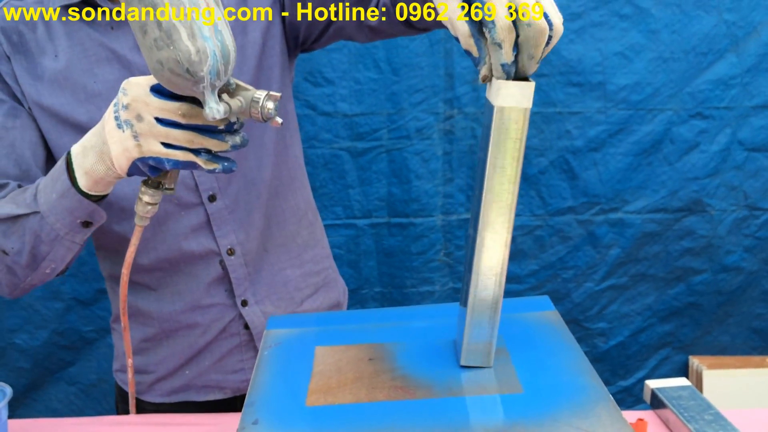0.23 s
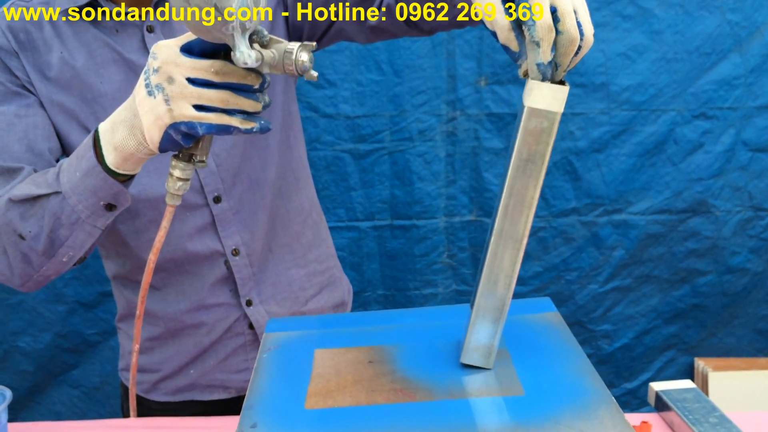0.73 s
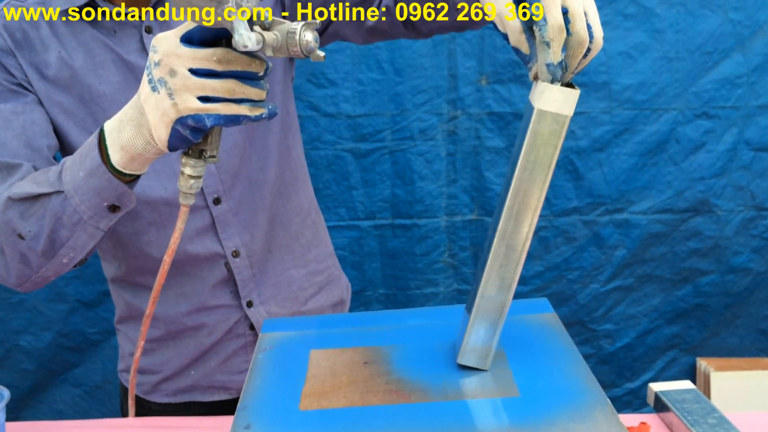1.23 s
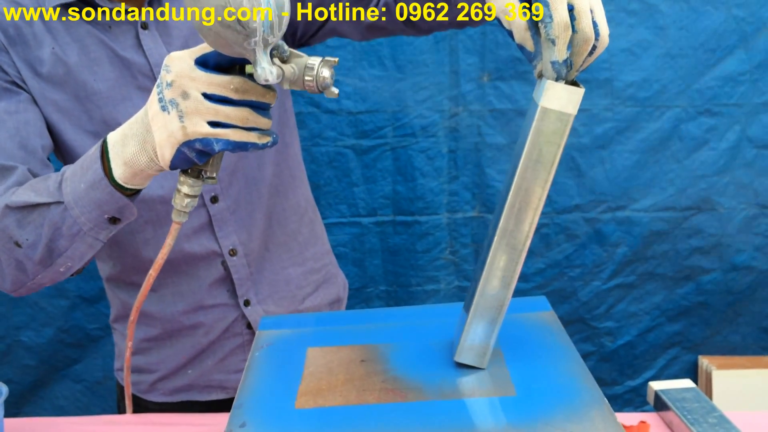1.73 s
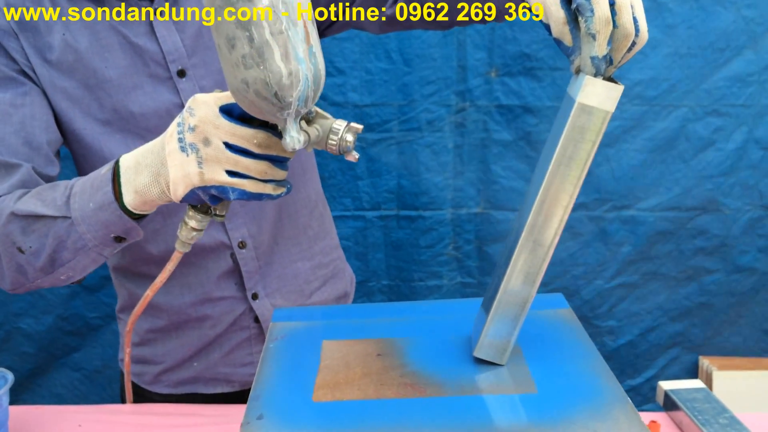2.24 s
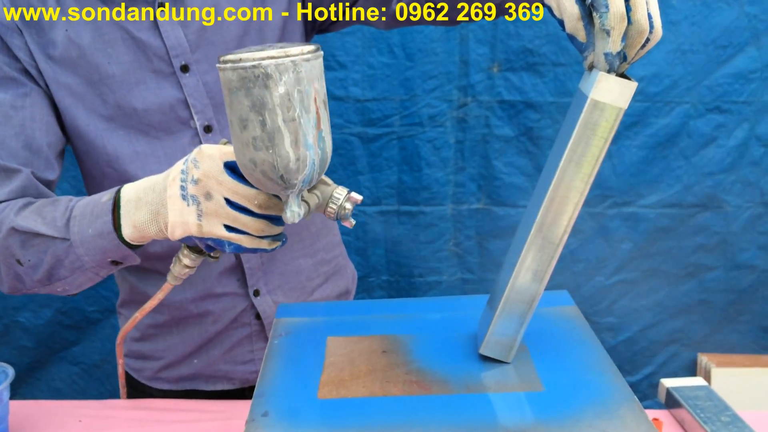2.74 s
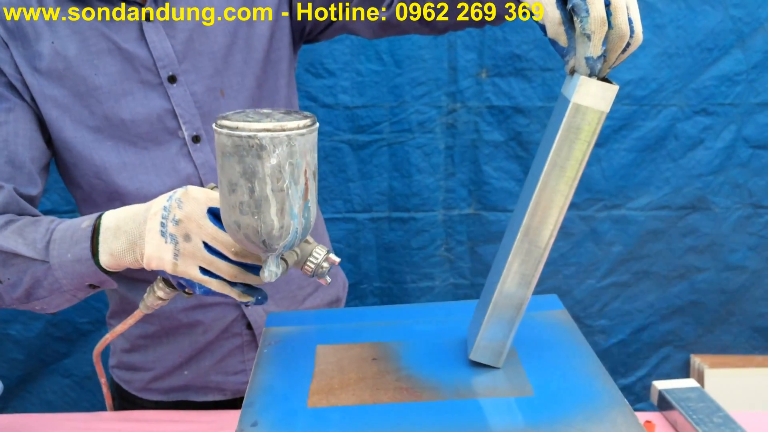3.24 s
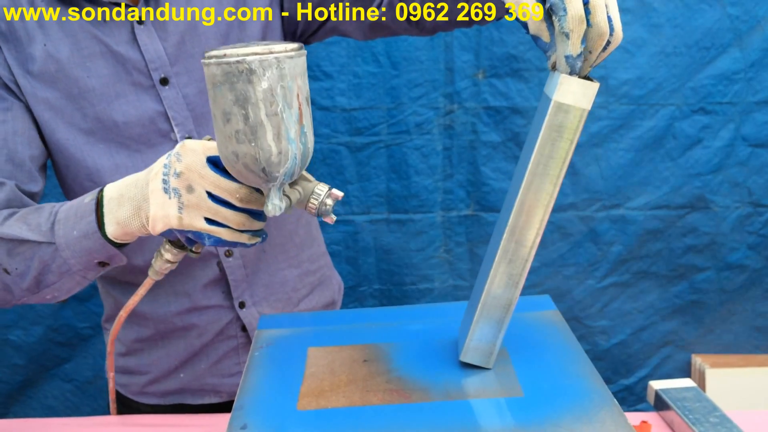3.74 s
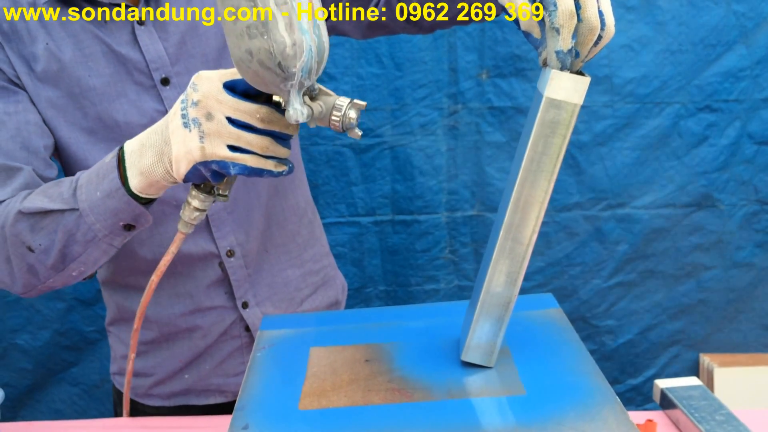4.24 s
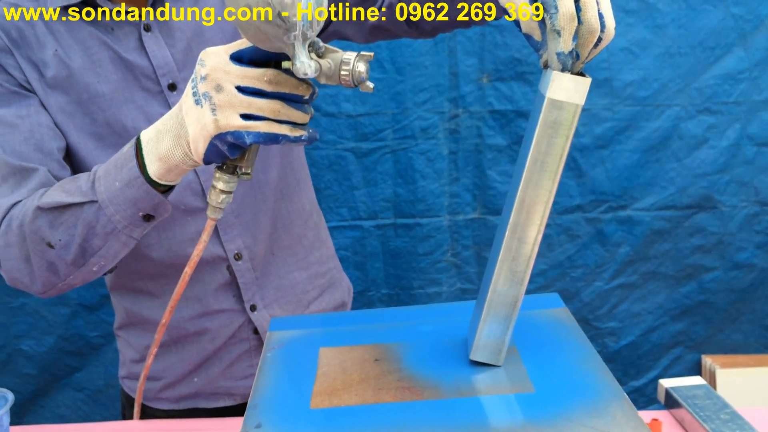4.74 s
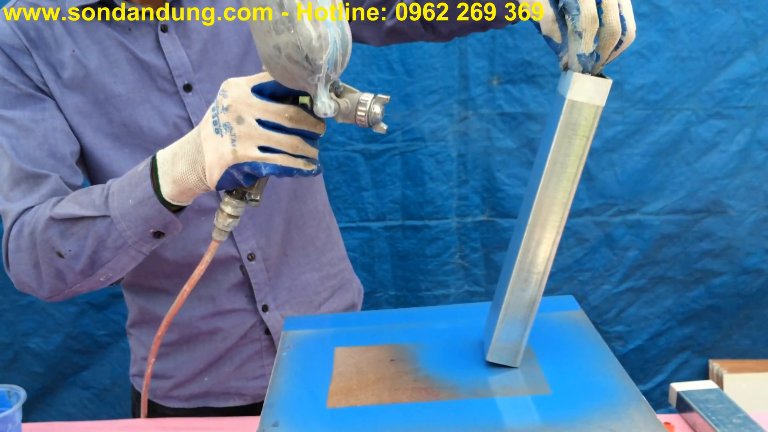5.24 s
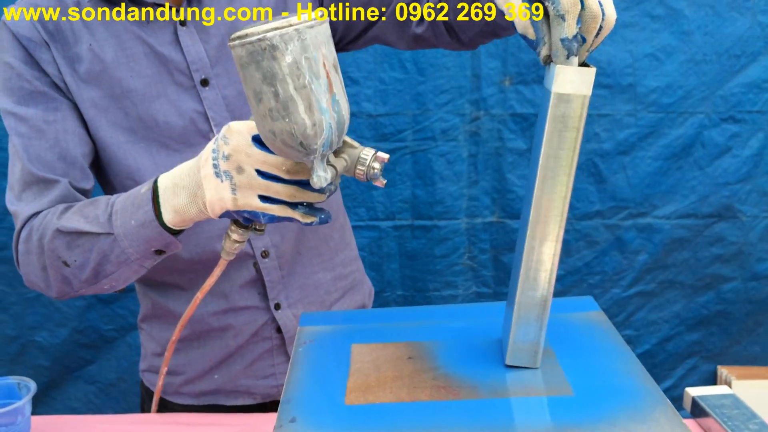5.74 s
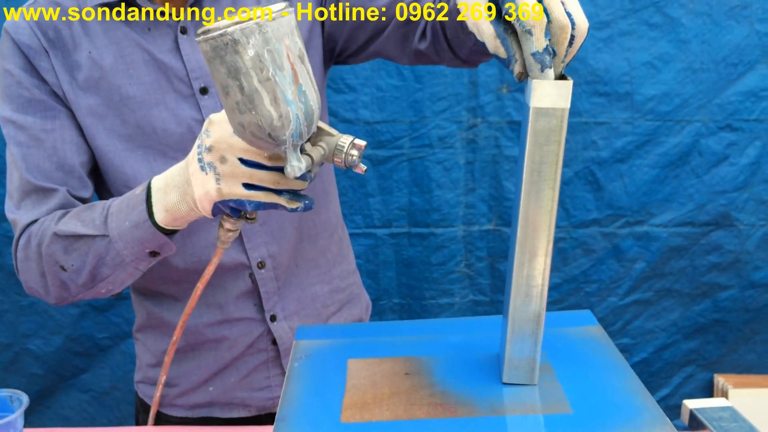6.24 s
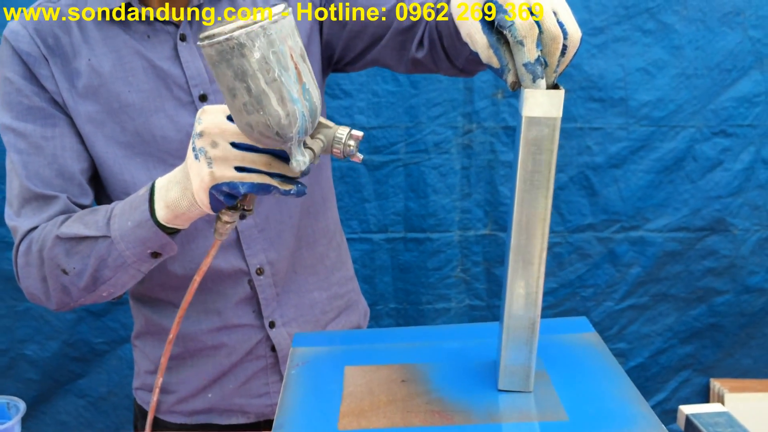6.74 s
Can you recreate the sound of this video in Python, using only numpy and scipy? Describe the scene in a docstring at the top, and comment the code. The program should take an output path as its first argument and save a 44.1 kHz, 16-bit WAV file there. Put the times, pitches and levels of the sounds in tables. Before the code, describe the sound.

A paint spray gun hisses in two long bursts in a workshop while gusts of air rumble and flutter on the microphone.

```python
"""A paint spray gun is triggered twice at a metal tube in a workshop.
From the start, moving air buffets the microphone: rumble, flutter, single eddies; one faint tick.
At 1.15 s the turbulent jet starts to hiss; from 3 s it briefly sings in the tube's air column.
It stops at 3.4 s and reopens at once; a far horn sounds from 3.6 to 4.5 s. After 5.7 s the jet is off,
leaving gusts, two ticks and workshop noise. The two channels are nearly alike."""
import sys
import numpy as np
from scipy import signal
from scipy.fft import rfft, irfft, next_fast_len
from scipy.io import wavfile

SR = 44100
rng = np.random.default_rng(int(sys.argv[2]) if len(sys.argv) > 2 else 0)


def master(y):
    """Save y as 16-bit WAV."""
    cut = np.clip(np.atleast_2d(y).T, -1, 1)
    pcm = np.round(cut * 32767)  # scale
    wavfile.write(sys.argv[1], SR, pcm.astype(np.int16))


N = 308744
TIME_S = np.arange(N) / SR

# One curve per trigger pull. Each row: time in seconds, jet level in dB, low-hiss boost in dB.
TRIGGER_PULLS = [
    [(1.15, -17.5, 1.5), (1.27, -21.5, -1), (2.06, -26.5, 0.8), (2.71, -27, 3.5), (3.35, -24.5, 3.5),
     (3.39, -26, 3)],
    [(3.47, -24.5, 4), (4.23, -29.5, 5.5), (4.39, -26.5, 3.5), (5.13, -28.5, 2.5), (5.72, -27.5, 2)],
]
# Jet hiss colour. Each row: frequency in Hz, relative density in dB.
JET_SPECTRUM = [(530, -46), (900, -28), (1010, -24.5), (1170, -24.5), (1420, -23), (2620, -16.5),
                (6030, -6.5), (7240, -5.5), (10900, 0), (11900, 1), (15500, -48), (22000, -120)]
# Jet blowing across the tube. Each row: time in seconds, level in dB.
TUBE_LEVEL = [(2.98, -58), (3.08, -46.5), (3.22, -44), (3.39, -35), (3.43, -56), (3.52, -40.5),
              (3.58, -35.5), (3.62, -50), (3.75, -40)]
# Steady air over the microphone. Each row: time in seconds, rumble level in dB.
BREEZE_LEVEL = [(0, -46), (0.12, -37.5), (0.45, -41), (0.62, -25.5), (1.05, -30.5), (1.85, -31.5),
                (2.0, -34), (2.7, -30.5), (3.2, -34.5), (3.55, -35.5), (4.1, -25.5), (4.3, -44.5),
                (4.52, -39), (4.75, -29.5), (5.45, -26.5), (5.68, -31.5), (6.2, -33), (6.53, -36.5),
                (6.8, -22), (7, -17)]
# Gusts. Each row: start in seconds, length in seconds, rumble in dB, flutter in dB.
AIR_GUSTS = [(0.158, 0.041, -30, -42), (0.211, 0.028, -16, -12), (0.257, 0.032, -27, -33.5),
             (0.303, 0.042, -20.5, -18.5), (0.547, 0.068, -32.5, -42), (0.773, 0.053, -41, -26.5),
             (0.883, 0.054, -22, -30), (0.965, 0.063, -42, -41), (1.112, 0.041, -18, -22),
             (1.146, 0.027, -20, -20), (1.307, 0.083, -31, -31.5), (1.532, 0.042, -40, -32.5),
             (1.653, 0.06, -38, -27), (1.726, 0.047, -31, -40.5), (2.074, 0.043, -36, -33.5),
             (2.145, 0.025, -30, -28), (2.334, 0.06, -32, -50), (2.487, 0.018, -31, -38),
             (2.609, 0.094, -38, -57), (3.02, 0.04, -49, -35.5), (3.272, 0.11, -21, -23.5),
             (3.408, 0.034, -18.5, -46), (3.623, 0.03, -46, -32.5), (3.85, 0.17, -28.5, -32),
             (3.978, 0.097, -36, -32), (4.194, 0.033, -34, -51), (4.584, 0.1, -21, -39.5),
             (4.722, 0.069, -17, -27), (4.834, 0.1, -30, -33.5), (4.933, 0.047, -21, -18.5),
             (5.092, 0.042, -21.5, -25.5), (5.133, 0.03, -26, -28), (5.215, 0.03, -42, -23.5),
             (5.292, 0.05, -35, -40), (5.534, 0.06, -19, -26), (5.745, 0.015, -40, -27.5),
             (5.952, 0.043, -20, -28.5), (6.02, 0.04, -23, -23), (6.319, 0.021, -39, -35.5),
             (6.466, 0.024, -30.5, -52), (6.574, 0.04, -14.5, -19), (6.629, 0.039, -15, -16.5),
             (6.701, 0.09, -14.5, -26), (6.885, 0.22, -31, -21.5)]
# Strongest eddies at the ports. Each row: time in seconds, level in dB, base pitch in Hz.
STRONG_EDDIES = [(0.173, -12, 108), (0.214, -14, 346), (0.221, -3, 262), (0.23, -10, 500), (0.256, -5, 111),
                 (0.304, -12, 503), (0.324, -16, 520), (0.342, -3.5, 800), (0.562, -10, 111),
                 (0.689, -12, 380), (0.784, -11.5, 420), (0.815, -2, 135), (0.925, -23, 117),
                 (1.029, -21, 540), (1.133, 4, 497), (1.156, -5.5, 740), (1.163, -8, 199),
                 (1.32, -9.5, 223), (1.353, -12, 614), (1.38, -14, 150), (1.436, -8, 111), (1.662, -1, 185),
                 (1.678, -7, 490), (2.12, -12, 131), (2.502, -6, 111), (2.605, -19, 121), (2.686, -17, 112),
                 (2.735, -12, 155), (3.282, -22, 447), (3.303, -2, 480), (3.33, -1, 694),
                 (3.369, -4.5, 770), (3.423, -10, 416), (3.75, -12, 286), (3.904, -10.5, 305),
                 (3.979, -0.5, 191), (4.006, -7.5, 606), (4.2, -13.5, 156), (4.604, -9, 132),
                 (4.684, -13, 119), (4.739, -8.5, 755), (4.757, -9, 188), (4.783, -20, 112),
                 (4.877, -9, 520), (4.94, -1, 505), (4.976, -11, 790), (5.098, -9, 370), (5.141, -4, 403),
                 (5.221, -12.5, 590), (5.414, -10, 133), (5.549, -4, 165), (5.582, -3.5, 231),
                 (5.75, -18, 480), (5.977, -9, 435), (6.033, -3, 260), (6.059, -7.5, 440),
                 (6.325, -8.5, 120), (6.579, -7, 506), (6.587, 4.5, 278), (6.612, -6, 324),
                 (6.634, 2.5, 447), (6.647, -3, 531), (6.716, -12, 260), (6.739, -6.5, 546),
                 (6.745, -6, 100), (6.785, -21, 263), (6.887, -20.5, 518), (6.906, -7.5, 540),
                 (6.932, -10, 640), (6.956, 2, 567)]
# An eddy's main swing, slow swing and snap. Each row: ratio to base pitch, gain.
EDDY_SWINGS = [(0.92, 0.57), (0.62, 0.3), (2.07, 0.088)]
# Far horn. Each row: time in seconds, level in dB.
HORN_LEVEL = [(3.62, -60), (3.72, -45.5), (3.97, -42), (4.04, -54), (4.4, -65), (4.5, -75)]
# Horn partials. Each row: frequency in Hz, relative level in dB.
HORN_PARTIALS = [(990.5, 0), (1486, -19), (1642, -15)]
# Small dry ticks nearby. Each row: start in seconds, level in dB, T60 in seconds.
NEAR_TICKS = [(0.1479, -52, .07), (6.078, -42, 0.022), (6.794, -60, .05)]
# Workshop background. Each row: time in seconds, level in dB.
BACKGROUND_LEVEL = [(0, -48), (0.3, -53), (0.7, -52), (6.4, -50.5), (6.7, -54.5), (7, -56.5)]
# Background colour. Each row: frequency in Hz, relative density in dB.
BACKGROUND_SPECTRUM = [(150, -28.5), (450, 1.8), (950, -4.5), (2700, -7.5), (4600, -18), (11900, -26)]
# Bands where left and right differ. Each row: low edge in Hz, high edge in Hz, side gain in dB.
STEREO_BANDS = [(772, 1500, -24.5), (3610, 5110, -21)]

VALVE_OPEN_S, DRAIN_T60_S = 0.011, (0.032, 0.092)   # one T60 per pull
TUBE_HZ, TUBE_WIDTH_HZ = 533, 72
RUMBLE_HZ, FLUTTER_HZ = (49.6, 147), (200, 515)
BREEZE_FLUTTER_DB, BREEZE_LUMP_DB, FLUTTER_LUMP_DB = -22, 2.5, 4.5
GUST_RISE_S, GUST_FALL_S = 0.0046, 0.011
EDDIES_PER_S, EDDY_HZ = 37, (237, 648)
EDDY_OFFSET_DB, EDDY_SPREAD_DB, EDDY_CAP_DB = -4, 4.5, -12
ROOM_T60_S, ROOM_DB = 0.13, -9.5


def jet():
    """Turbulent hiss: the valve opens fast; on release, pressure drains from the nozzle."""
    flow = np.zeros(N)
    for pull, t60_s in zip(TRIGGER_PULLS, DRAIN_T60_S):
        start_s, end_s = pull[0][0], pull[-1][0]
        opening = np.clip(1 + (TIME_S - start_s) / VALVE_OPEN_S, 0, 1) ** 2
        draining = from_db(-60 * np.clip(TIME_S - end_s, 0, 1) / t60_s)
        flow += from_db(curve(pull)) * opening * draining
    boost_db = curve(np.vstack(TRIGGER_PULLS), column=2)
    return flow * coloured_noise(JET_SPECTRUM, flicker_db=1.04, shelf_hz=3600, shelf_db=boost_db)


def tube():
    """The air column answers the jet with a breathy note."""
    note = band(rng.standard_normal(N), TUBE_HZ - TUBE_WIDTH_HZ / 2, TUBE_HZ + TUBE_WIDTH_HZ / 2)
    inside_s = np.minimum(TIME_S - TUBE_LEVEL[0][0], TUBE_LEVEL[-1][0] - TIME_S)
    fade = np.clip(inside_s / 0.04, 0, 1)
    return from_db(curve(TUBE_LEVEL)) * fade * unit_rms(note)


def air_flow():
    """Rumble and flutter gains: a lumpy breeze plus gusts that rise, hold and fall."""
    grid_s = TIME_S[::20]
    start_s, length_s, rumble_db, flutter_db = np.transpose(AIR_GUSTS)
    age_s = grid_s[:, None] - start_s
    rise = np.minimum(age_s, 0) / GUST_RISE_S
    fall = np.maximum(age_s - length_s, 0) / GUST_FALL_S
    gusts = np.exp(-rise ** 2 - fall ** 2)
    lumps = drift(20.5)
    lumps = np.where(lumps > 0, 1.4 * np.tanh(lumps / 1.4), lumps)   # upward swings level off
    rumble = from_db(curve(BREEZE_LEVEL) + BREEZE_LUMP_DB * lumps)
    flutter = rumble * from_db(BREEZE_FLUTTER_DB + FLUTTER_LUMP_DB * lumps)
    return (rumble + np.interp(TIME_S, grid_s, gusts @ from_db(rumble_db)),
            flutter + np.interp(TIME_S, grid_s, gusts @ from_db(flutter_db)))


def wind(rumble_gain, flutter_gain):
    """Air buffets the microphone: uneven rumble and a more sharply beating flutter."""
    beats = drift(34)
    rumble = band(rng.standard_normal(N), *RUMBLE_HZ) * from_db(4.4 * beats)
    flutter = band(rng.standard_normal(N), *FLUTTER_HZ) * from_db(4.3 * beats + 4.4 * drift(71))
    air = rumble_gain * unit_rms(rumble) + flutter_gain * unit_rms(flutter)
    # low-pass: the membrane averages out small eddies
    return signal.sosfilt(signal.butter(3, 950, fs=SR, output="sos"), air)


def eddies(rows):
    """Each eddy pushes and pulls the membrane for a cycle or two, with a slower swing and faint snap."""
    pressure = np.zeros(N + SR)
    phases_rad = rng.uniform(0, 2 * np.pi, (500, len(EDDY_SWINGS)))
    from_centre_s = TIME_S[:SR // 10] - 1 / 20
    for (time_s, level_db, pitch_hz), swing_phases in zip(rows, phases_rad):
        at = round(time_s * SR)
        for (ratio, gain), phase in zip(EDDY_SWINGS, swing_phases):
            cycles = from_centre_s * pitch_hz * ratio
            window = np.exp(-(cycles / np.where(cycles < 0, .5, .8)) ** 2)
            swing = window * np.cos(2 * np.pi * cycles + phase)
            pressure[at:at + len(swing)] += gain * from_db(level_db) * swing
    return pressure[SR // 20:][:N]


def lesser_eddies(flutter_gain):
    """Eddies at random times and pitches; their strength follows the flutter, up to a cap."""
    gap_draw, level_draw, pitch_draw = rng.random((400, 3)).T
    time_s = np.cumsum(-np.log(1 - gap_draw)) / EDDIES_PER_S
    flutter_db = 20 * np.log10(np.interp(time_s, TIME_S, flutter_gain))
    level_db = flutter_db + EDDY_OFFSET_DB - EDDY_SPREAD_DB * np.log(1 - level_draw)
    pitch_hz = EDDY_HZ[0] * (EDDY_HZ[1] / EDDY_HZ[0]) ** pitch_draw
    rows = np.transpose([time_s, np.minimum(level_db, EDDY_CAP_DB), pitch_hz])
    return eddies(rows[time_s < TIME_S[-1]])


def horn():
    """Steady pitches whose levels waver over the distance."""
    sounding = (TIME_S > HORN_LEVEL[0][0]) & (TIME_S < HORN_LEVEL[-1][0])
    tone = sum(from_db(db + 3.4 * drift(20.5)) * np.sqrt(2) * np.sin(2 * np.pi * hz * TIME_S)
               for hz, db in HORN_PARTIALS)
    return from_db(curve(HORN_LEVEL)) * sounding * tone


def ticks(ring_hz=(2600, 4600), ring_db=-3):
    """Brief bright noise bursts with a hard mid-band ring."""
    envelope = sum(from_db(db - 60 * np.clip(TIME_S - start_s, 0, 1) / t60_s) * (TIME_S > start_s)
                   for start_s, db, t60_s in NEAR_TICKS)
    white = rng.standard_normal(N)
    burst = unit_rms(band(white, 1700, 12000, order=1))
    ring = from_db(ring_db) * unit_rms(band(white, *ring_hz))
    return envelope * (burst + ring)


def workshop_reverb(source):
    """Short diffuse tail: exponentially decaying noise."""
    age_s = TIME_S[:SR // 2]
    tail = rng.standard_normal(len(age_s)) * from_db(-60 * age_s / ROOM_T60_S)
    return from_db(ROOM_DB) * signal.fftconvolve(source, tail / np.linalg.norm(tail))[:N]


def workshop_background():
    """Faint, slightly flickering midrange noise."""
    return from_db(curve(BACKGROUND_LEVEL)) * coloured_noise(BACKGROUND_SPECTRUM, flicker_db=1.0)


def coloured_noise(spectrum, flicker_db, shelf_hz=0, shelf_db=0):
    """Shaped noise in flickering half-octave bands, with an optional low shelf."""
    point_hz, point_db = np.transpose(spectrum)
    size = next_fast_len(N, True)
    hz = np.fft.rfftfreq(size, 1 / SR) + 1
    colour = from_db(np.interp(np.log(hz), np.log(point_hz), point_db))
    shaped = rfft(rng.standard_normal(size)) * colour
    half_octave = 2 * np.log2(hz)
    common_drift = drift(19)
    noise = np.zeros(N)
    for centre in range(14, 29):
        part = irfft(shaped * np.clip(1 - abs(half_octave - centre), 0, 1), size)[:N]
        boost_db = shelf_db / (1 + (2 ** (centre / 2) / shelf_hz) ** 2) if shelf_hz else 0
        flicker = 0.32 * common_drift + drift(25) + 0.51 * drift(2)
        noise += part * from_db(flicker_db * flicker + boost_db)
    return noise / np.std(irfft(shaped, size))


def drift(corner_hz):
    """Slow random wander of unit spread."""
    step = 20
    pole = np.exp(-2 * np.pi * step * corner_hz / SR)
    slow = signal.lfilter([1], [1, -2 * pole, pole * pole], rng.standard_normal(N // step + 2002))[2000:]
    return np.interp(np.arange(N) / step, np.arange(len(slow)), unit_rms(slow - slow.mean()))


def band(x, low_hz, high_hz, order=2):
    """Butterworth band-pass."""
    return signal.sosfilt(signal.butter(order, [low_hz, high_hz], "band", fs=SR, output="sos"), x)


def curve(rows, column=1):
    """One column of a time table, interpolated per sample."""
    columns = np.transpose(rows)
    return np.interp(TIME_S, columns[0], columns[column])


def from_db(db):
    """Level to gain."""
    return 10 ** (np.asarray(db) / 20)


def unit_rms(x):
    """Scale to rms 1."""
    return x / np.sqrt(np.mean(x ** 2) + 1e-20)


def scene():
    """All sources, equal in both channels."""
    hiss = jet()
    background = workshop_background()
    rumble_gain, flutter_gain = air_flow()
    air = wind(rumble_gain, flutter_gain) + eddies(STRONG_EDDIES) + lesser_eddies(flutter_gain)
    mono = hiss + workshop_reverb(hiss) + air + tube() + horn() + ticks() + background
    return np.array([mono, mono])


def record(dry):
    """Round the peaks, part the channels faintly in two bands, cut deep bass and top."""
    side_delay_s, low_cut_hz, high_cut_hz = .003, 46, 12030
    stereo = .9 * np.tanh(dry / .9)
    delayed = np.roll(stereo[0], round(side_delay_s * SR))
    for low_hz, high_hz, db in STEREO_BANDS:
        band_pass = signal.ellip(5, 1, 70, [low_hz, high_hz], "band", fs=SR, output="sos")
        side = from_db(db + 5.9 * drift(8)) * signal.sosfilt(band_pass, delayed)
        stereo += [side, -side]
    stereo = signal.sosfilt(signal.butter(3, low_cut_hz, "high", fs=SR, output="sos"), stereo)
    return signal.sosfilt(signal.ellip(13, .5, 70, high_cut_hz, fs=SR, output="sos"), stereo)


dry = scene()
out = record(dry)
master(out)
```